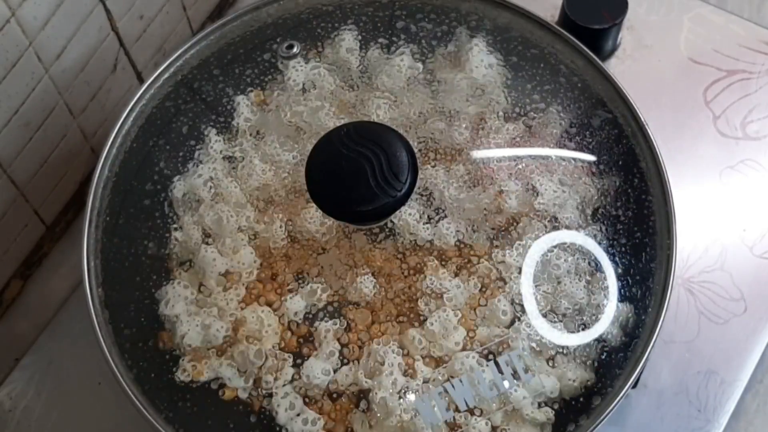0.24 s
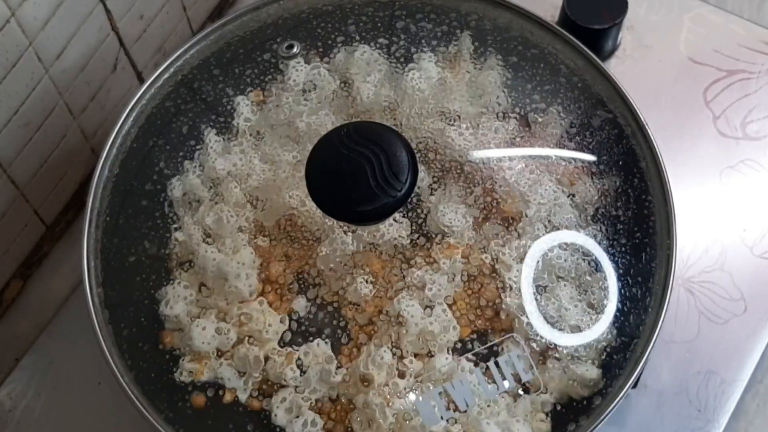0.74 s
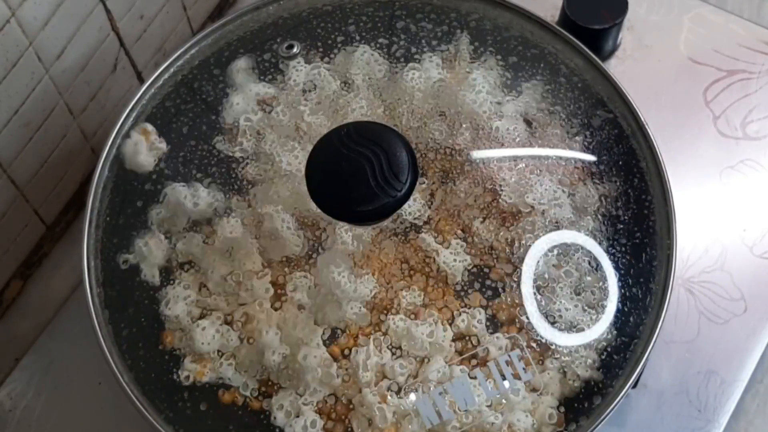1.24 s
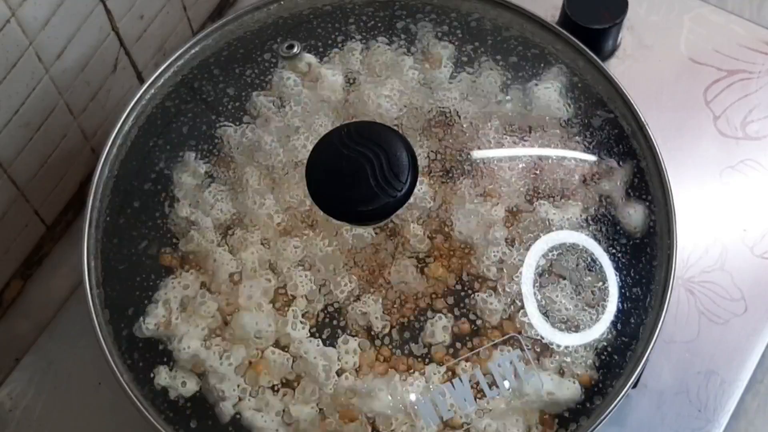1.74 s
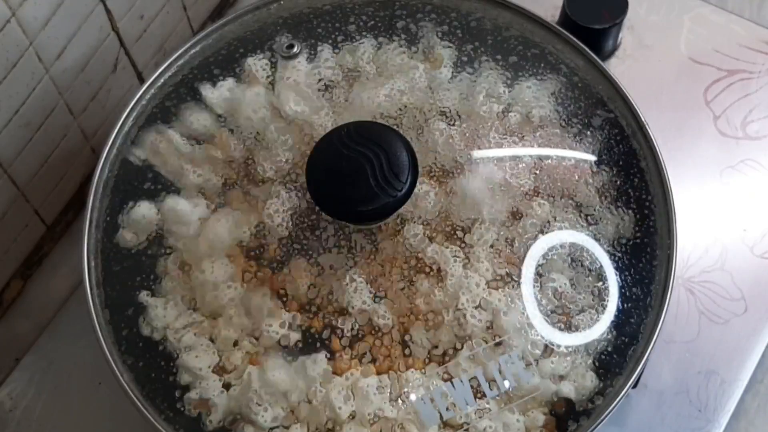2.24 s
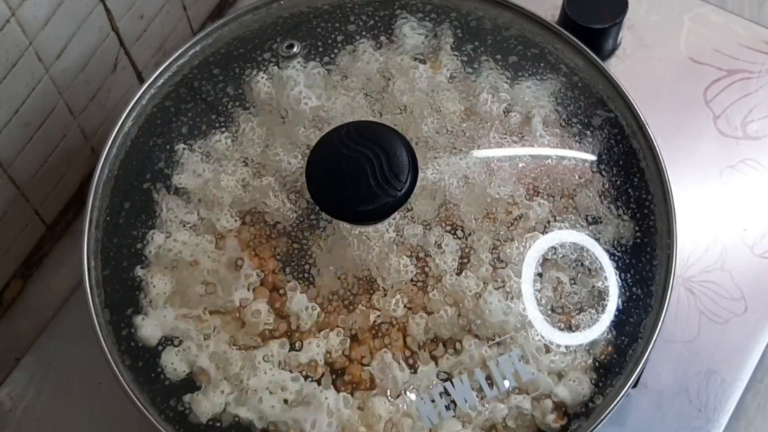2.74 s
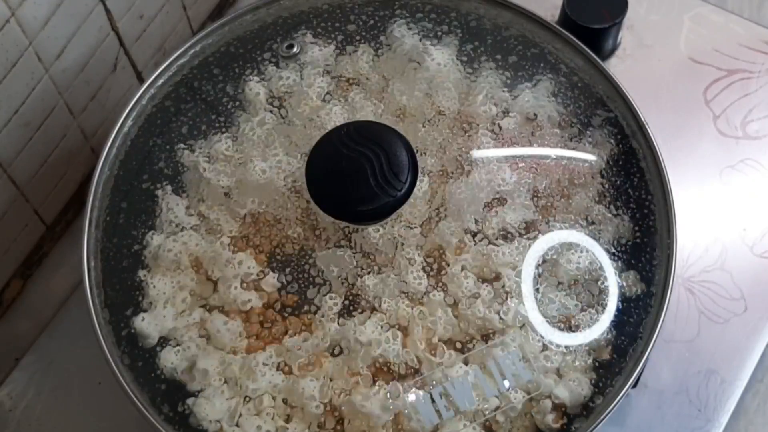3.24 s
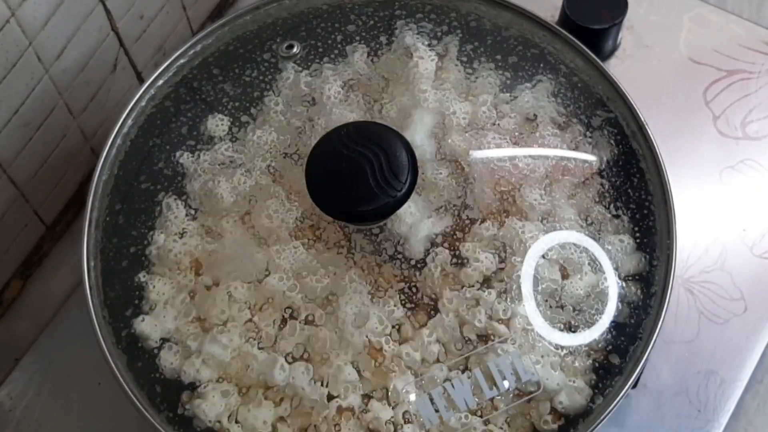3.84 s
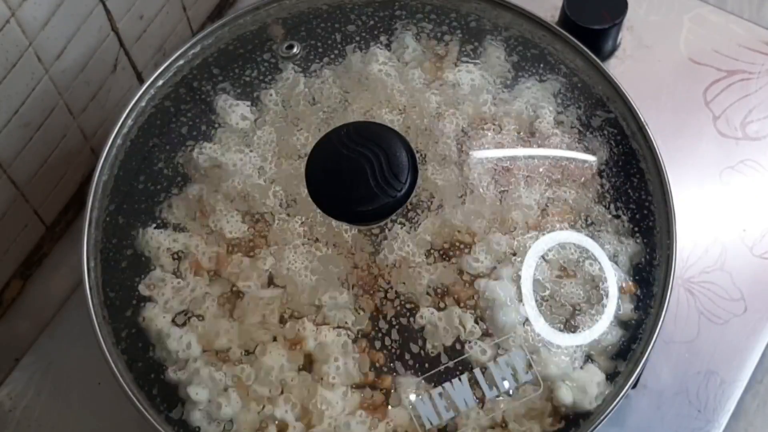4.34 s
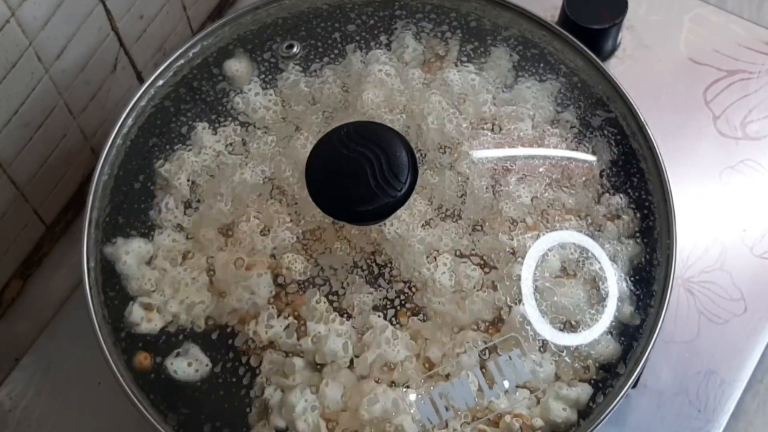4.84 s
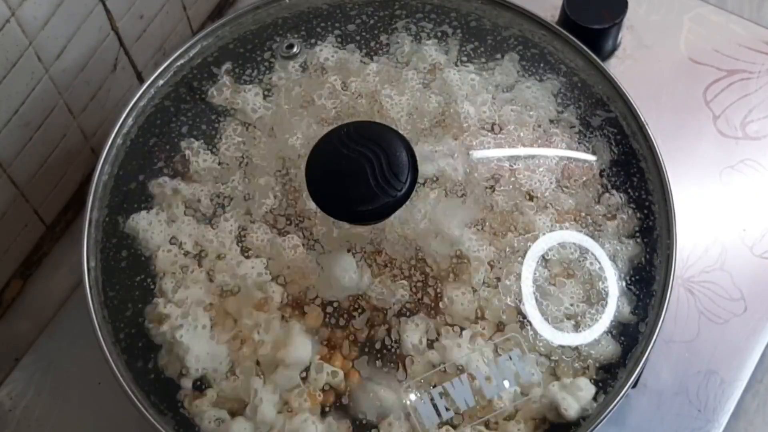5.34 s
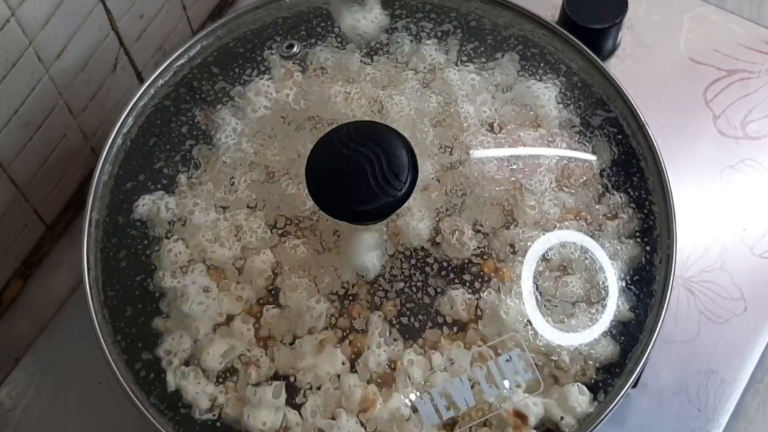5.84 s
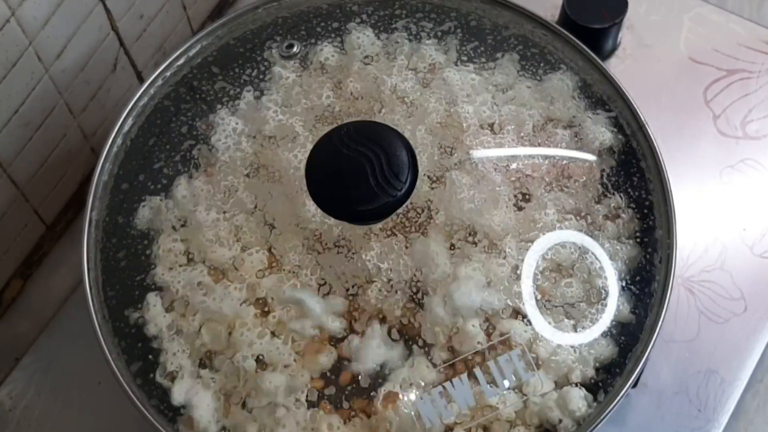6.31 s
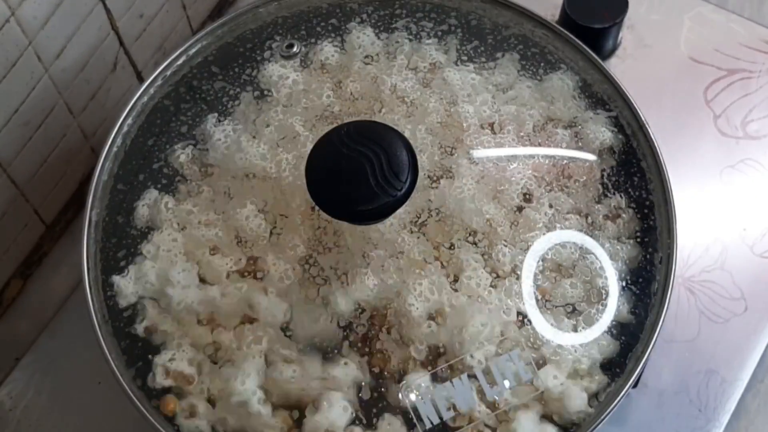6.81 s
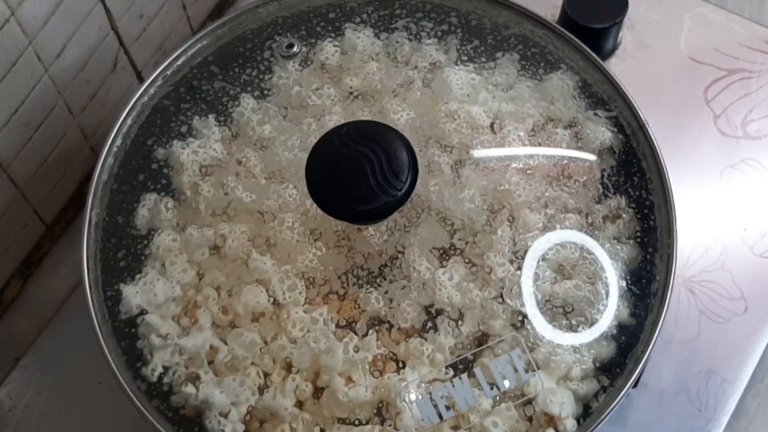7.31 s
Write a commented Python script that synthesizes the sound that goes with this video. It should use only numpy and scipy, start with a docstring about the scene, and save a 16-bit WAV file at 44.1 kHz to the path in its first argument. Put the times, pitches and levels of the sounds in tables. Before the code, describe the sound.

Popcorn bursts rapidly in a covered pan, sharp cracks and low thumps with kernels ticking on the glass lid over faint sizzle.

```python
"""Popcorn under a glass lid

Popcorn pops in hot oil in a pan with a glass lid, on a stove in a small kitchen.
Each kernel cracks its hull (pitched noise burst), spits steam (bright noise burst) and thumps the pan (low sines).
Flung kernels tick against the lid, pieces fall back, and stirred kernels rattle: short resonant or dull bursts.
Random droplet bursts make the faint sizzle; shaped noise makes the stove's steady rumble."""
import sys
import numpy as np
from scipy import signal
from scipy.io import wavfile

SR = 44100
rng = np.random.default_rng(int(sys.argv[2]) if len(sys.argv) > 2 else 0)


def dump_mix(stems):
    """Bounce the given channels to the path in sys.argv[1] as a 16-bit WAV at rate SR."""
    frames = np.atleast_2d(stems).T  # one column per channel
    limited = np.clip(frames, -1, 1)  # hard clip at full scale
    pcm = np.round(limited * 32767).astype(np.int16)
    wavfile.write(sys.argv[1], SR, pcm)


N = 333830
LEAD = SR // 10  # samples of popping before time zero


def from_db(db):
    """Decibels to amplitude gain."""
    return 10 ** (np.asarray(db) / 20)


def at_hz(points, hz):
    """Interpolate a table on a log-frequency axis."""
    table = np.array(points)
    return np.interp(np.log(hz), np.log(table[:, 0]), table[:, 1])


def unit_energy(x):
    """Scale to an energy of one, averaged over the channels."""
    return x / np.sqrt(np.mean(np.sum(x ** 2, axis=-1)) + 1e-20)


def panned(x, right_db):
    """Lean a stereo sound to the right by a level difference."""
    return x * from_db(np.array([[-right_db], [right_db]]) / 2)


def add(track, s, sound):
    """Mix a short sound into a track at time s."""
    start = max(0, LEAD + round(s * SR))
    track[start:start + len(sound)] += sound[:max(0, len(track) - start)]


def resonate(x, hz, width_hz):
    """Two-pole resonance with a peak gain of about one."""
    r = np.exp(-np.pi * width_hz / SR)
    zeros = np.array([1, 0, -1]) * (1 - r * r) / 2
    poles = [1, -2 * r * np.cos(2 * np.pi * hz / SR), r * r]
    return signal.lfilter(zeros, poles, x)


def damped(modes, t):
    """One exponentially dying sine per mode."""
    return [from_db(db - 60 * t / t60) * np.sin(2 * np.pi * hz * t) for hz, db, t60 in modes]


def burst(rise_s, fall_s, grain_db, size=900):
    """A brief ragged rush of tiny fractures; the fall time varies at random around fall_s."""
    t = np.arange(size) / SR
    rush, grain = rng.standard_normal((2, size))
    rise = (1 - np.exp(-t / rise_s)) ** 2
    fall = np.exp(-t / (fall_s * 2 ** rng.uniform(-1.29, 1)))
    return unit_energy(rise * fall * rush * from_db(grain_db * grain))


def bursts(times_s, levels_db, sounds, count):
    """Deal the events in turn to a few spots in the pan, one track each."""
    spots = np.zeros((count, LEAD + N))
    for k, (s, db, sound) in enumerate(zip(times_s, levels_db, sounds)):
        add(spots[k % count], s, from_db(db) * unit_energy(sound))
    return spots


# Left-right correlation of scattered sound. Each row: frequency in Hz, correlation from -1 to 1.
STEREO_LIKENESS = [(100, 0.99), (280, 0.72), (550, 0.6), (1100, 0.085), (2500, 0), (15000, 0)]


def noise_bands(size):
    """Third-octave stereo noise, alike in the bass and unrelated in the treble: yields (Hz, band)."""
    edges_hz = np.geomspace(24, 16500, 29)
    white = rng.standard_normal((2, 2, size + 4000))  # neighbouring bands use separate noise
    for k, (low, high) in enumerate(zip(edges_hz, edges_hz[1:])):
        sos = signal.butter(2, [low, high], "band", fs=SR, output="sos")
        mid, side = signal.sosfilt(sos, white[k % 2])[:, -size:]  # filter onset dropped
        hz = np.sqrt(low * high)
        alike = np.clip(at_hz(STEREO_LIKENESS, hz), -1, 1)
        yield hz, np.sqrt(1 + alike) * mid + np.sqrt(1 - alike) * side * [[1], [-1]]


# Kitchen reverberation. Each row: frequency in Hz, t60 in seconds.
KITCHEN_DECAY = [(60, 0.75), (160, 0.27), (420, 0.33), (1100, 0.32), (3000, 0.32), (7700, 0.2),
                 (15000, 0.19)]


def response(colour, pan_t60_s, room_db, direct_db, size=20000):
    """Path to the microphone: direct spike, dense echoes under the lid, kitchen tail.

    room_db and direct_db are relative to the echoes under the lid."""
    t, path = np.arange(size) / SR, 0
    echoes = unit_energy(from_db(-60 * t / pan_t60_s))
    near = echoes + from_db(direct_db) * unit_energy(np.exp(-t / 0.00022))
    for hz, band in noise_bands(size):
        decay = from_db(-60 * t / at_hz(KITCHEN_DECAY, hz))
        tail = from_db(room_db) * unit_energy(decay * (1 - np.exp(-t / 0.00067)))
        band_gain = from_db(at_hz(colour, hz)) * np.sqrt(hz)  # per-Hz level to band level
        path = path + band_gain * unit_energy(band * np.hypot(near, tail))
    return unit_energy(path)


def through(x, path):
    """Convolve a sound with a stereo path and drop the lead."""
    return signal.oaconvolve(x[None], path, axes=1)[:, LEAD:LEAD + N]


# Ringing of the lid and the air under it. Each row: frequency in Hz, width in Hz,
# level in dB before ring_db and scatter, lean to the right in dB.
LID_RINGING = [(896, 140, 2, 7), (1219, 59, 13, 2.5), (1350, 170, -22, 3), (1496, 6.2, -1, 24),
               (1920, 77, 3.5, 15.5), (2276, 17.3, 11.5, 5.5), (2817, 23, 8.5, 0), (3016, 63, 2.5, 3),
               (3560, 71, -5.5, -5), (4044, 48, -9, 23), (4660, 270, -4.5, -8), (5800, 53, -22, 4)]


def lid_ring(path, ring_db, spread_db):
    """The lid's modes ring on after a blow, each with a random strength for the spot."""
    rings = 0
    for hz, width_hz, db, right_db in LID_RINGING:
        gain = from_db(db + ring_db + rng.normal(0, spread_db))
        rings = rings + gain * panned(resonate(path, hz, width_hz), right_db)
    return unit_energy(path + rings)


# Bursting kernels, often in close pairs. Each row: time in seconds, then steam puff, hull crack
# and thump levels in dB before gain_db.
KERNEL_POPS = [(-0.035, -29, -27, -25), (0.0652, -27, -37, -23.5), (0.3293, -51, -51, -55.5),
               (0.5097, -29.5, -39, -32), (0.5238, -27, -32.5, -32.5), (0.5921, -35.5, -38.5, -28),
               (0.6336, -45, -41.0, -45), (0.9279, -36.5, -45, -30.5), (1.046, -38.5, -45, -38.5),
               (1.2133, -42.0, -43, -45), (1.2591, -20.5, -32, -32.5), (1.337, -28.0, -34.5, -24.5),
               (1.4042, -26.5, -32.5, -35.5), (1.4174, -23.5, -29, -38), (1.4879, -20.5, -25.5, -33),
               (1.531, -29, -43, -24), (1.5612, -32.0, -33.5, -24.5), (1.6024, -26.5, -31.5, -31),
               (1.6936, -20.5, -33.5, -32), (1.729, -28.5, -33, -28), (1.8538, -36.5, -38.5, -35.5),
               (1.8771, -29, -34.5, -30.5), (1.991, -41, -45, -29.0), (2.0231, -31, -24.5, -30),
               (2.0639, -26.5, -30, -20.0), (2.108, -21, -27.5, -27.5), (2.2393, -27.0, -26, -27.5),
               (2.2899, -20.0, -27, -22.5), (2.4073, -29, -33, -26), (2.5997, -22, -30.5, -31),
               (2.672, -31.5, -34.5, -23.5), (2.79, -50, -57, -25.5), (2.811, -26.5, -40, -26),
               (2.855, -32.0, -33, -38), (2.926, -28, -32, -18), (3.0435, -45, -42, -28.5),
               (3.0718, -38.5, -38, -33), (3.313, -37.5, -40.5, -34), (3.3726, -29, -38.5, -28.5),
               (3.3852, -28.5, -31.5, -30.5), (3.4614, -29, -34.5, -31), (3.5032, -22.5, -38, -23.5),
               (3.556, -24.5, -33, -20.5), (3.8207, -40, -33.5, -38), (3.8475, -40, -34.0, -22.5),
               (4.0031, -34, -34, -29), (4.055, -30.5, -35, -31), (4.1273, -37.0, -37, -32.0),
               (4.144, -25, -31, -14.5), (4.1636, -34.5, -41, -28), (4.204, -31.5, -36.5, -25.5),
               (4.3007, -31.5, -32, -19.5), (4.4719, -43.0, -50.5, -48), (4.5689, -31.5, -41.5, -37),
               (4.6302, -37.5, -41.5, -31.5), (4.69, -41.5, -42, -32.5), (4.7971, -28.5, -28.5, -27.5),
               (5.0091, -30, -42, -38.5), (5.0683, -33.5, -33.5, -21.5), (5.116, -36, -39, -20.5),
               (5.1555, -22, -34, -20), (5.1807, -27, -34.0, -26.0), (5.2394, -48, -35.5, -22.5),
               (5.256, -22, -32, -28), (5.3111, -23.5, -27.5, -20.5), (5.3645, -35, -38, -23.0),
               (5.5188, -36.5, -37, -34), (5.5332, -31, -33.5, -18.5), (5.6589, -34, -33.0, -20.5),
               (5.6946, -30.5, -36, -23), (5.7725, -41, -52, -33), (5.8085, -37, -33.5, -19.5),
               (5.9689, -36.0, -43.5, -41), (6.0148, -29, -27, -24.5), (6.0633, -46, -35, -17.5),
               (6.2585, -33, -38.5, -18.5), (6.3138, -21.5, -29.5, -24.0), (6.4571, -33, -42, -24.5),
               (6.4658, -28.5, -46, -41), (6.7603, -25.5, -33, -31), (6.8149, -24, -35.5, -25.5),
               (6.843, -19.0, -27.5, -21.5), (6.9038, -35, -42, -28), (6.9699, -27.5, -31.5, -33.5),
               (7.23, -33, -39.5, -45), (7.2497, -28, -39.5, -48), (7.3372, -39, -35, -31.5),
               (7.4588, -36, -41.5, -28), (7.4781, -41, -35.5, -22), (7.52, -36, -58.5, -45)]
# Colour of steam puffs. Each row: frequency in Hz, relative level in dB per Hz.
PUFF_COLOUR = [(3000, -58), (6000, -4), (8800, -11.5), (11000, -5.5), (13000, 2), (16000, -10)]


def steam_puffs(gain_db, room_db):
    """Steam leaves the split hull in a bright spit."""
    s, puff_db, _, _ = np.transpose(KERNEL_POPS)
    spits = [burst(rise_s=0.00054, fall_s=0.0019, grain_db=3.0) for _ in s]
    spots = bursts(s - 0.0007, puff_db + gain_db, spits, count=5)
    return sum(through(x, response(PUFF_COLOUR, pan_t60_s=0.045, room_db=room_db, direct_db=-3))
               for x in spots)


# Colour of hull cracks. Each row: frequency in Hz, relative level in dB per Hz.
CRACK_COLOUR = [(350, -1.5), (600, -10.5), (900, -9.5), (1250, -3), (1650, -6), (2200, -6.5), (3200, -3),
                (4500, -5), (6500, -6), (9000, -9.5), (15000, -22.5)]


def hull_cracks(gain_db, room_db):
    """The hull tears, each at a pitch of its own, and sets the lid ringing."""
    s, _, crack_db, _ = np.transpose(KERNEL_POPS)
    tears = []
    for _ in s:
        tear = burst(rise_s=0.00081, fall_s=0.0016, grain_db=5.0)
        pitch_hz = 3000 * 2 ** rng.uniform(-1.22, 1)
        tears.append(tear + from_db(2.0) * resonate(tear, pitch_hz, width_hz=2700))
    heard = 0
    for x in bursts(s - 0.0006, crack_db + gain_db, tears, count=5):
        path = response(CRACK_COLOUR, pan_t60_s=0.081, room_db=room_db, direct_db=-4)
        heard = heard + through(x, lid_ring(path, ring_db=-2.0, spread_db=0.7))
    return heard


# Low modes of the covered pan on its stand. Each row: frequency in Hz, relative level in dB, t60 in seconds.
PAN_BODY_MODES = [(64.8, -17, 0.21), (112.8, -6.5, 0.087), (254.2, 1.5, 0.045), (308, -2.5, 0.049),
                  (435.7, -24, 0.075), (500, -32, 0.12)]
# Standing waves of the kitchen. Each row: frequency in Hz, relative level in dB, t60 in seconds.
STANDING_WAVES = [(90.3, -22, 0.47), (114.8, -31.5, 0.74), (181, -25.5, 0.15)]
# Kitchen's low resonance under the thumps. Each row: frequency in Hz, relative level in dB per Hz.
BOOM_COLOUR = [(40, -30), (90, -1), (120, -5), (170, 3.5), (260, -5), (340, 2.5), (480, -2), (900, -2)]


def thumps(gain_db, room_db, right_lag_s, size=20000):
    """The recoil drives the pan's low modes, neighbours in opposite sense; the kitchen booms after it."""
    t, kicks = np.arange(size) / SR, np.zeros(LEAD + N)
    for s, _, _, thump_db in KERNEL_POPS:
        add(kicks, s - 0.001, from_db([thump_db + gain_db]))
    body = sum((-1) ** k * mode for k, mode in enumerate(damped(PAN_BODY_MODES, t)))
    tones = body - sum(damped(STANDING_WAVES, t))
    direct = np.array([tones, np.interp(t - right_lag_s, t, tones)])
    build_up = np.clip((t - 0.008) / 0.023, 0, 1)
    room = 0
    for hz, band in noise_bands(size):
        if hz < BOOM_COLOUR[-1][0]:
            decay = from_db(-60 * t / at_hz(KITCHEN_DECAY, hz))
            band_gain = from_db(at_hz(BOOM_COLOUR, hz)) * np.sqrt(hz / SR)
            room = room + band_gain * unit_energy(band * build_up * decay)
    boom = signal.fftconvolve(room, body[None], axes=1)[:, :size]
    return through(kicks, direct + from_db(room_db) * boom)


def sizzle(per_s, size_db, rms_db):
    """Tiny droplets of water burst at random in the oil."""
    size = LEAD + N
    struck = rng.random(size) < per_s / SR
    strength = from_db(size_db * np.minimum(rng.exponential(1, size), 4))
    spits = struck * strength * rng.choice([-1, 1], size)
    heard = through(spits, response(PUFF_COLOUR, pan_t60_s=0.037, room_db=6.0, direct_db=-12.0))
    return from_db(rms_db) * np.sqrt(N) * unit_energy(heard)


# Steady noise of stove and room. Each row: frequency in Hz, relative band level in dB per Hz.
STOVE_COLOUR = [(20, -32), (40, -31), (60, -1), (95, 0), (160, -15), (300, -9), (550, -23), (1000, -21.5),
                (2000, -28.5), (4000, -21.5), (8000, -45), (16000, -35)]


def stove(rms_db):
    """A soft steady rumble with a little hiss, from weighted noise bands."""
    noise = sum(from_db(at_hz(STOVE_COLOUR, hz)) * band for hz, band in noise_bands(N))
    return from_db(rms_db) * np.sqrt(N) * unit_energy(noise)


# Colour of kernel ticks. Each row: frequency in Hz, relative level in dB per Hz.
TICK_COLOUR = [(600, -1), (1300, -10), (2400, -6.5), (3500, -6), (4800, -8.5), (6500, -6.5), (9000, -13.5),
               (15000, -14)]


def rattle(gain_db, longest_delay_s, spread_db, count=3):
    """Every pop stirs a few unpopped kernels, which tick faintly soon after; louder after a harder kick."""
    s, _, _, thump_db = np.repeat(KERNEL_POPS, count, axis=0).T
    when_s = s + longest_delay_s * rng.uniform(0.1, 1, len(s))
    level_db = gain_db + thump_db / 2 + rng.normal(0, spread_db, len(s))
    pitch_hz = 3500 * 2 ** rng.normal(0, 0.58, len(s))
    clicks = [resonate(burst(rise_s=0.00014, fall_s=0.00055, grain_db=16.0), hz, width_hz=2500)
              for hz in pitch_hz]
    track, = bursts(when_s, level_db, clicks, count=1)
    path = response(TICK_COLOUR, pan_t60_s=0.05, room_db=-2.0, direct_db=-3.0)
    return through(track, lid_ring(path, ring_db=-2.0, spread_db=1.5))


# Colour of pieces falling back into the pan. Each row: frequency in Hz, relative level in dB per Hz.
LANDING_COLOUR = [(300, 12.5), (550, 3), (850, 3.5), (1300, -7.5), (1800, -4), (3000, -13.5), (5000, -15),
                  (9000, -7.5), (15000, 1)]


def landings(gain_db, longest_flight_s, spread_db, count=3):
    """Every pop tosses a few fluffy pieces, which fall back softly; louder after a harder kick."""
    s, _, _, thump_db = np.repeat(KERNEL_POPS, count, axis=0).T
    when_s = s + longest_flight_s * rng.uniform(0.14, 1, len(s))
    level_db = gain_db + thump_db / 2 + rng.normal(0, spread_db, len(s))
    pats = [burst(rise_s=0.0004, fall_s=0.001, grain_db=1.0) for _ in s]
    heard = 0
    for x in bursts(when_s, level_db, pats, count=2):
        path = response(LANDING_COLOUR, pan_t60_s=0.023, room_db=6.0, direct_db=-23.0)
        heard = heard + through(x, lid_ring(path, ring_db=-6.0, spread_db=5.0))
    return heard


# Larger pieces dropping on the pan. Each row: time in seconds, level in dB before gain_db, pitch in Hz.
HOLLOW_KNOCKS = [(0.134, -46, 790), (0.668, -48, 760), (4.692, -35, 900), (4.735, -44, 786)]


def knocks(gain_db):
    """A heavier piece lands and rings the hollow pan briefly."""
    s, knock_db, pitch_hz = np.transpose(HOLLOW_KNOCKS)
    rings = [resonate(burst(rise_s=0.0002, fall_s=0.0005, grain_db=5.0), hz, width_hz=55)
             for hz in pitch_hz]
    track, = bursts(s, knock_db + gain_db, rings, count=1)
    return through(track, response(LANDING_COLOUR, pan_t60_s=0.034, room_db=-4.0, direct_db=4.0))


# Hardest hits of flung kernels on lid and wall. Each row: time in seconds, level in dB before gain_db,
# pitch in Hz.
KERNEL_HITS = [(0.5487, -30, 3640), (0.95, -36, 3350), (0.9799, -23, 3840), (0.9972, -26.5, 4000),
               (1.1084, -29.5, 3830), (1.363, -18, 4400), (1.6245, -20, 4130), (1.9142, -35, 3500),
               (2.09, -36, 4160), (2.2625, -32, 3660), (2.34, -35, 3660), (2.5214, -31.5, 4440),
               (2.83, -36.5, 2770), (2.9904, -33, 2900), (3.5334, -36.5, 3220), (3.875, -33.5, 3730),
               (3.9208, -34.5, 3100), (3.9445, -34.0, 3050), (4.1809, -32.5, 3240), (4.227, -21, 3960),
               (4.239, -25.5, 4300), (4.373, -36, 3910), (4.907, -41.5, 2920), (6.0903, -39, 3840),
               (6.781, -27, 3820)]


def kernel_ticks(gain_db, room_db):
    """Hard kernels strike the glass: short, pitched clicks without a thump."""
    s, tick_db, pitch_hz = np.transpose(KERNEL_HITS)
    clicks = [resonate(burst(rise_s=0.00054, fall_s=0.00062, grain_db=4.5), hz, width_hz=1270)
              for hz in pitch_hz]
    heard = 0
    for x in bursts(s, tick_db + gain_db, clicks, count=4):
        path = response(TICK_COLOUR, pan_t60_s=0.074, room_db=room_db, direct_db=-6.0)
        heard = heard + through(x, lid_ring(path, ring_db=-0.5, spread_db=0.5))
    return heard


def scene():
    """Pops, ticks, falling pieces and sizzle in the pan, over the stove's noise."""
    puffs = panned(steam_puffs(gain_db=28.5, room_db=2.5), right_db=1.5)
    cracks = panned(hull_cracks(gain_db=31.0, room_db=0.5), right_db=0.5)
    low = panned(thumps(gain_db=7.5, room_db=-9.0, right_lag_s=0.00022), right_db=1.3)
    steady = sizzle(per_s=430, size_db=6.5, rms_db=-58.5) + stove(rms_db=-58)
    stirred = rattle(gain_db=-15.0, longest_delay_s=0.13, spread_db=3.5)
    fallen = landings(gain_db=-5.5, longest_flight_s=0.11, spread_db=5.0) + knocks(gain_db=17.5)
    ticks = panned(kernel_ticks(gain_db=26.5, room_db=-1.0), right_db=-0.4)
    return puffs + cracks + low + steady + stirred + fallen + ticks


def record(dry):
    """The microphone drops the deepest bass, and the top is cut steeply."""
    low_cut_hz, top_cut_hz = 43, 15900
    thinned = signal.sosfilt(signal.butter(2, low_cut_hz, "high", fs=SR, output="sos"), dry)
    return signal.sosfilt(signal.ellip(10, 0.1, 70, top_cut_hz, fs=SR, output="sos"), thinned)


dry = scene()
out = record(dry)
dump_mix(out)
```